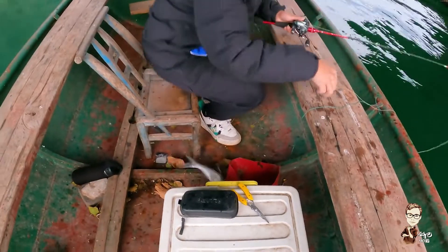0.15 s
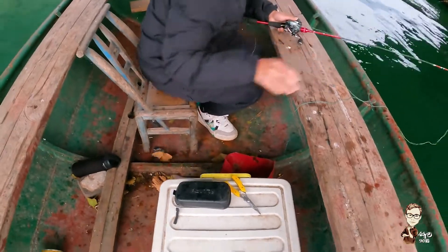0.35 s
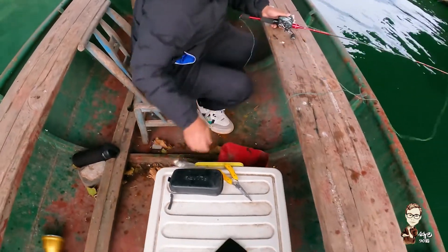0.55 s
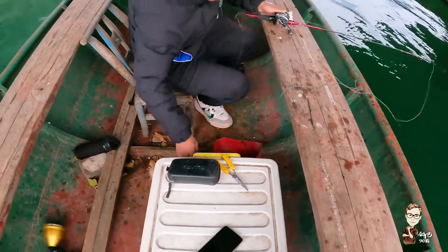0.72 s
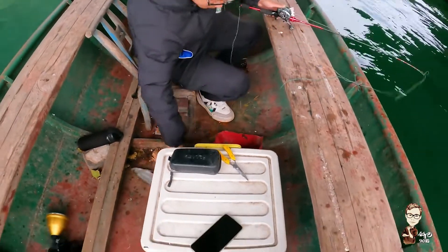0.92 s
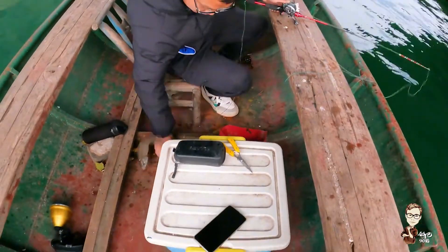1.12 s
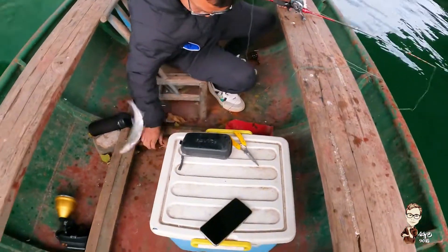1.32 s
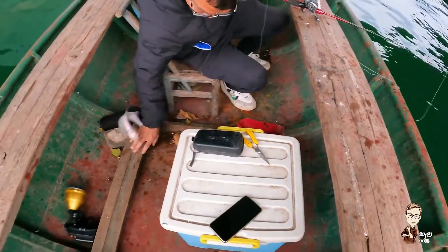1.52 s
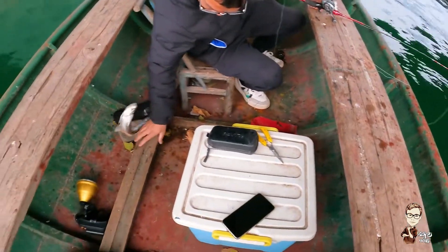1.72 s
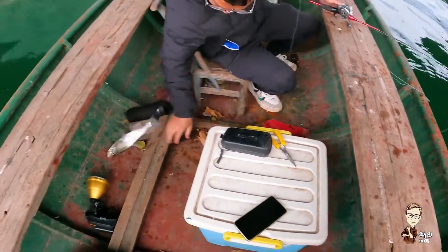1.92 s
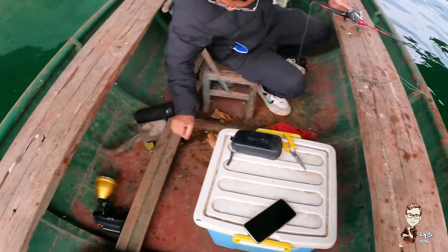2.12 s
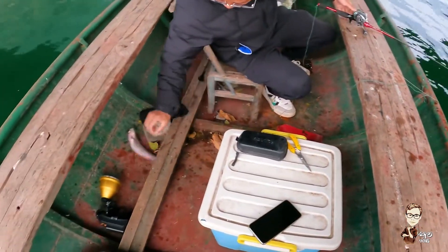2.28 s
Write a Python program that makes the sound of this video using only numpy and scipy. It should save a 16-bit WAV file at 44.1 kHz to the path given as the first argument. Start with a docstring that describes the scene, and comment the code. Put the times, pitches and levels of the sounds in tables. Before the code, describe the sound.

A fish flops on a boat's wooden floor with irregular thuds and wet slaps.

```python
"""A caught fish flops on the plank floor of a small open boat, close to a stereo microphone.
First its body drums on the boards, which ring in short wooden modes over a dense hull rumble and boom,
while fins and tail slap wetly. Near 0.5 s its flank scrapes the planks, the hardest blows follow, and
here and there a loose plank sings out. After 1.2 s the thuds weaken; at 2 s come a last slap and a
sharp click. Quiet air, water hiss and low wind lie under it all."""
import sys
import numpy as np
from scipy import signal
from scipy.fft import rfft, irfft, next_fast_len
from scipy.io import wavfile

SR = 44100
rng = np.random.default_rng(int(sys.argv[2]) if len(sys.argv) > 2 else 0)


def materialize(psi):
    """Save the field psi as 16-bit PCM at rate SR to the path in sys.argv[1].

    A 1-D psi becomes a single channel; in a 2-D psi each row is a channel.
    """
    bounded = np.clip(np.atleast_2d(psi).T, -1, 1)
    quanta = np.round(bounded * 32767).astype(np.int16)
    wavfile.write(sys.argv[1], SR, quanta)


N = 103635


def amp(db):
    return 10 ** (np.asarray(db) / 20)


def unit(x):
    return x / np.sqrt(np.mean(x ** 2) + 1e-20)


def along(points, hz):
    """Interpolate (f/Hz, value) points on a log frequency axis."""
    f, v = np.transpose(points)
    return np.interp(np.log(hz + 1), np.log(f + 1), v)


def filtered(x, response):
    """Pass x through a complex frequency response."""
    n = x.shape[-1]
    padded = next_fast_len(n + 8192)
    return irfft(rfft(x, padded) * response(np.fft.rfftfreq(padded, 1 / SR)), padded)[..., :n]


def resonance(f, hz, width_hz):
    """Response of one causal resonance."""
    return 1j * f * width_hz / (hz * hz - f * f + 1j * f * width_hz)


def stereo_noise(count):
    """White noise, alike on both sides in the bass and less so in the treble."""
    # likeness across the microphone: f/Hz, correlation
    likeness = [(100, 1), (1000, 0.89), (10000, 0.6)]
    angle = lambda f: np.arccos(np.clip(along(likeness, f), -1, 1)) / 2
    white = rng.standard_normal((2, count))
    mid, side = filtered(white, lambda f: np.array([np.cos(angle(f)), np.sin(angle(f))]))
    return np.array([mid + side, mid - side])


def bumps(count, size, depth):
    """Random gain in steps of size samples."""
    return np.exp(depth * np.repeat(rng.standard_normal(count // size + 1), size)[:count])


def add(out, x, start_s):
    i = max(round(start_s * SR), 0)
    out[:, i:i + x.shape[1]] += x[:, :N - i]


def body_thuds(damping=0.11, soft_hz=3100, rise_s=0.0013):
    """Each blow of the soft body wakes the board modes near its centre and sets the hull rumbling."""
    # blows: t/s, ring level/dB, centre/octaves over 100 Hz, contact t60/s, rumble over ring/dB
    blows = [(0.077, -30, 4.05, 0.072, 6.5), (0.109, -25, 3.65, 0.054, 1), (.224, -17.5, 3.32, 0.074, 0.5),
             (.238, -20.5, 3.16, 0.12, -22), (0.399, -15.5, 0.92, 0.073, -4),
             (0.404, -14.5, 1.7, 0.14, 2.5), (.438, -16.5, 0.64, 0.014, -4.5),
             (0.464, -20.5, 1.06, 0.018, -1.5), (0.554, -9, 1.5, 0.057, -9.5), (0.576, -20, 0.49, 0.01, -9),
             (0.647, -26, 2.28, 0.048, 0.5), (.694, -13, 1.9, 0.079, 1.5), (.716, -7, 4.4, 0.041, -3.5),
             (.726, -18.5, 0.78, 0.093, -3.5), (.815, -9, 5.7, 0.065, -3), (.856, -19, 4.4, 0.13, -2),
             (0.89, -15, 3.4, 0.029, 2), (1.005, -18, 2.7, 0.064, 0), (1.125, -27.5, 3.35, 0.11, 8),
             (1.135, -19.5, 1.13, 0.2, 0), (1.174, -27, 1.05, 0.026, 1), (1.22, -21, 1.46, 0.024, -15),
             (1.447, -27, 1.7, 0.05, 3.5), (1.474, -26.5, 1.63, 0.04, 1), (1.558, -33, 3.3, 0.28, -10),
             (1.695, -32.5, 2.86, 0.069, 9), (2.008, -28, 2.99, 0.12, 7), (2.012, -33.5, 0.49, 0.12, 10.5)]
    # board modes: f/Hz, level/dB
    boards = [(170, 6), (200, 6), (255, 5), (363, 6), (420, 2), (480, 3), (517, 8), (690, -1.5), (785, -3),
              (930, 1), (1020, 4.5), (1330, -6), (1650, -12)]
    # balance at the microphone: f/Hz, left over right/dB
    balance = [(150, 0.5), (400, -2.5), (1400, -1)]
    out, t = np.zeros((2, N)), np.arange(SR // 2) / SR
    hz, mode_db = np.transpose(boards)
    mode_hz = hz[:, None]
    response = lambda f: resonance(f, mode_hz, damping * mode_hz) / (1 + 1j * f / soft_hz) ** 3
    for start, db, centre, t60, hull_db in blows:
        force = rng.standard_normal(len(t)) * bumps(len(t), size=42, depth=0.53)
        force *= amp(-60 * t / t60) * (1 - np.exp(-t / rise_s))
        force[20] += 3 * np.linalg.norm(force[:100])  # first impact
        spread = max(0.61 + 0.24 * (db + 20), 0.3)  # octaves: harder blows reach further
        reach = np.exp(-0.5 * ((np.log2(hz / 100) - centre) / spread) ** 2)
        gains = amp(mode_db + rng.normal(0, 3, len(hz))) * reach * (-1.) ** np.arange(len(hz))
        modes = filtered(force[:SR // 4], response)
        ring = (gains * np.sqrt(hz) / np.linalg.norm(modes, axis=1)) @ modes
        ring = np.pad(ring / np.abs(ring).max(), (0, len(t) - len(ring)))
        rumble = hull_rumble(t, mode_hz, gains, 4.3 * damping, soft_hz)
        add(out, amp(db) * (ring + amp(hull_db) * np.linalg.norm(ring) * rumble), start)
    return filtered(out, lambda f: amp(np.outer([0.5, -0.5], along(balance, f))))


def hull_rumble(t, mode_hz, gains, width, soft_hz, tilt_db_per_octave=-2.5, swell_s=0.0075):
    """The hull rings densely around the struck modes, darker than the knock and longest in the bass."""
    # hull decay: f/Hz, t60/s
    decay = [(150, 0.99), (600, 0.52), (2000, 0.44)]
    f, frame_s, spectrum = signal.stft(stereo_noise(len(t)), SR, nperseg=512)
    mode_power = np.abs(resonance(f, mode_hz, width * mode_hz)) ** 2
    colour = np.sqrt(gains ** 2 @ mode_power) / (1 + (f / soft_hz) ** 2)
    colour *= amp(tilt_db_per_octave * np.log2(f + 100))
    spectrum *= colour[:, None] * amp(-60 * frame_s / along(decay, f)[:, None])
    rumble = signal.istft(spectrum, SR, nperseg=512)[1][:, :len(t)] * (1 - np.exp(-t / swell_s))
    return rumble / np.linalg.norm(rumble[0])


def loose_planks(width=0.11, rise_s=0.0035):
    """A loose plank sings as the fish drums on it: a dying rattle through one narrow resonance."""
    # plank notes: t/s, level/dB, f/Hz, t60/s
    notes = [(0.404, -18.5, 705, 0.19), (0.418, -16, 252, 0.22), (0.864, -19, 491, 0.21),
             (0.966, -17, 512, 0.094), (1.438, -37, 1630, 0.41), (1.7, -37.5, 777, 0.35),
             (2.03, -37, 913, 0.68)]
    out, t = np.zeros((2, N)), np.arange(SR // 2) / SR
    for start, db, hz, t60 in notes:
        hum = unit(filtered(stereo_noise(len(t)), lambda f: resonance(f, hz, width * hz) ** 2))
        add(out, amp(db - 60 * t / t60) * (1 - np.exp(-t / rise_s)) * hum, start)
    return out


def wet_slaps(width=0.28, ring_db=8, crest_db=12, spray_db=-14.5, spray_t60=0.46):
    """Fins and tail slap and scuff: noise bursts with one resonance each, then a slower spray tail."""
    # slaps: t/s, rough peak level/dB, f/Hz, t60/s
    slaps = [(0.0044, -33.5, 2920, 0.13), (0.076, -33.5, 2700, 0.043), (0.111, -30, 2170, 0.062),
             (0.2085, -31, 2580, 0.12), (0.2324, -19, 2130, 0.086), (0.2491, -24, 2400, 0.13),
             (0.3619, -24.5, 5400, 0.009), (0.4682, -24, 5700, 0.046), (0.4909, -24.5, 2440, 0.13),
             (0.5185, -23, 2100, 0.12), (0.6446, -34.5, 2470, 0.22), (0.6942, -25, 2520, 0.063),
             (0.7147, -21.5, 2400, 0.039), (0.794, -20.5, 2420, 0.1), (0.8515, -14, 2580, 0.087),
             (0.9273, -25, 4800, 0.24), (1.052, -27.5, 4350, 0.012), (1.1252, -19.5, 5650, 0.1),
             (1.3019, -39, 3960, 0.075), (1.44, -35, 2510, 0.72), (1.5545, -30, 2820, 0.22),
             (1.6182, -29, 2140, 0.035), (1.6893, -30.5, 5640, 0.16), (2.0056, -16, 2540, 0.05),
             (2.0767, -14.5, 6300, 0.031), (2.2129, -29.5, 6700, 0.13), (2.3181, -35, 2700, 0.27)]
    # spray spectrum: f/Hz, level/dB
    spray = [(710, -20), (1200, 2), (1390, -5.5), (3290, -8.5), (7350, -12), (12200, -26), (15100, -43)]
    out, t = np.zeros((2, N)), np.arange(SR // 3) / SR
    for start, db, hz, t60 in slaps:
        shape = amp(-60 * t / t60) + amp(spray_db - 60 * t / spray_t60)
        shape *= 1 - np.exp(-t / (0.0052 * t60))  # long scuffs start softly
        grains = stereo_noise(len(t)) * bumps(len(t), size=20, depth=0.04)
        tilt = 0.34 * np.log2(hz / 3000)  # higher slaps are brighter all over
        hiss = filtered(grains, lambda f: amp(along(spray, f)) * (1 + f / 3000) ** tilt * (f > 700))
        burst = unit(hiss) * shape / shape.max()
        slap = filtered(burst, lambda f: 1 + amp(ring_db) * resonance(f, hz, width * hz))
        add(out, amp(db - crest_db) * slap, start)
    return out


def dry_clicks(width=0.42, broad_db=-12, fizz_db=-10, fizz_t60=0.0072, dull_hz=9000):
    """Ticks as of hook or fin on something hard: an impulse and fizz through a ring and a broad band."""
    # clicks: t/s, peak level/dB, f/Hz
    clicks = [(0.1382, -26.5, 2100), (0.343, -29, 5900), (1.3511, -38, 2500), (1.535, -21, 2500),
              (1.7341, -29, 2630), (2.005, -19.5, 2500), (2.077, -5, 6250), (2.2965, -34, 2220)]
    out, t = np.zeros((2, N)), np.arange(SR // 20) / SR
    broad = lambda f: amp(broad_db) * resonance(f, 3330, 6200) ** 2
    for start, db, hz in clicks:
        kick = (t == 0) + amp(fizz_db - 60 * t / fizz_t60) * stereo_noise(len(t))
        band = lambda f: (resonance(f, hz, width * hz) ** 2 + broad(f)) / (1 + (f / dull_hz) ** 6)
        click = filtered(kick, band)
        add(out, amp(db) * click / np.abs(click).max(), start)
    return out


def flank_scrape(edge_s=0.0045, hz=6500):
    """A wet flank drags over the planks: bright gritty hiss that holds, then stops short."""
    # slide: start t/s, end t/s, level/dB
    slides = [(0.455, 0.567, -46.5)]
    t = np.arange(N) / SR
    shape = sum(amp(db) * np.clip(np.minimum(t - start, end - t) / edge_s, 0, 1)
                for start, end, db in slides)
    grains = stereo_noise(N) * bumps(N, size=60, depth=0.56)
    return shape * unit(filtered(grains, lambda f: resonance(f, hz, hz) ** 2))


def hull_boom(knocks, gain_db=-11.5, t60=0.84, swell_s=0.0087):
    """The whole hull stores the energy of the knocks and gives it back as a deep unsteady boom."""
    t = np.arange(SR) / SR
    store = amp(-60 * t / t60) ** 2 * (1 - np.exp(-t / swell_s))
    energy = np.abs(signal.fftconvolve(knocks[0] ** 2, store / store.sum())[:N])
    bass = filtered(rng.standard_normal(N), lambda f: resonance(f, hz=97.5, width_hz=78) ** 2)
    return amp(gain_db) * np.sqrt(energy) * unit(bass)


def air_and_water(hiss_db=-46.5, wind_db=-53):
    """Soft steady hiss around the boat, with low buffeting that differs across the microphone."""
    # ambience spectrum: f/Hz, relative level/dB
    ambience = [(35, -13), (60, 2), (166, 5), (1720, -18.5), (7550, -22.5), (12300, -37.5), (15100, -56)]
    hiss = filtered(stereo_noise(N), lambda f: amp(along(ambience, f)) * (f > 50))
    gusts = rng.standard_normal((2, N)) + 1.2 * rng.standard_normal(N)
    wind = filtered(gusts, lambda f: resonance(f, hz=44, width_hz=42) ** 2)
    return amp(hiss_db) * unit(hiss) + amp(wind_db) * unit(wind)


def scene():
    """The fish close by, reaching left and right a little apart, over hull boom and open air."""
    # phase across the microphone: f/Hz, left minus right/rad
    phase = [(500, 0), (3200, -1), (5200, 0)]
    knocks = body_thuds() + loose_planks()
    fish = knocks + wet_slaps() + flank_scrape() + dry_clicks()
    fish = filtered(fish, lambda f: np.exp(1j * np.outer([0.5, -0.5], along(phase, f))))
    return fish + hull_boom(knocks) + air_and_water()


def record(dry, top_hz=15270):
    """The microphone passes nothing above its band limit."""
    return filtered(dry, lambda f: f < top_hz)


dry = scene()
out = record(dry)
materialize(out)
```